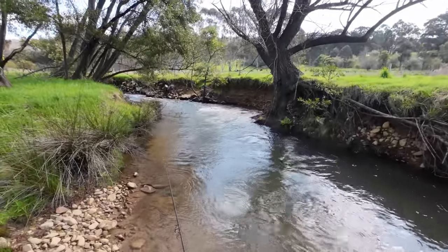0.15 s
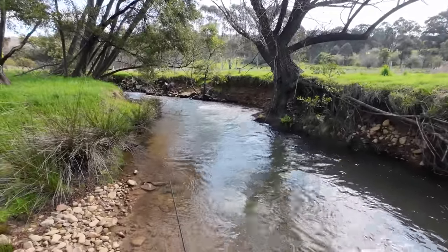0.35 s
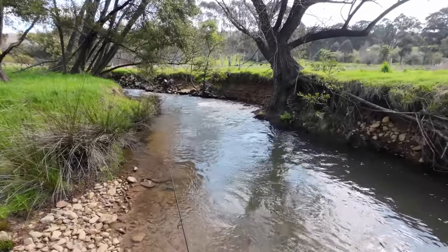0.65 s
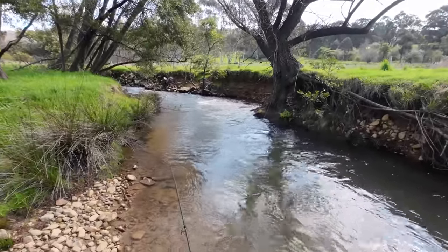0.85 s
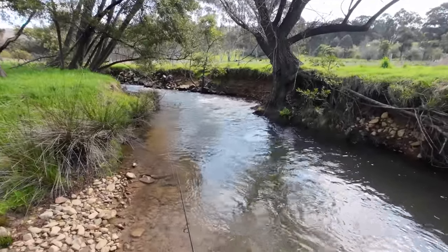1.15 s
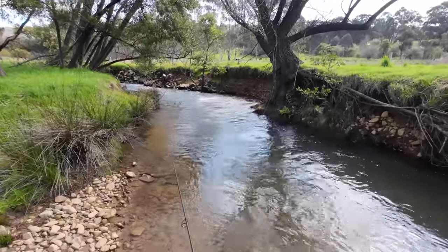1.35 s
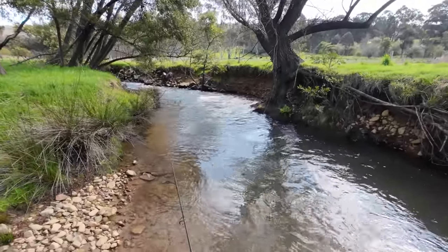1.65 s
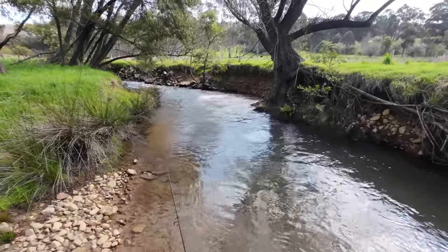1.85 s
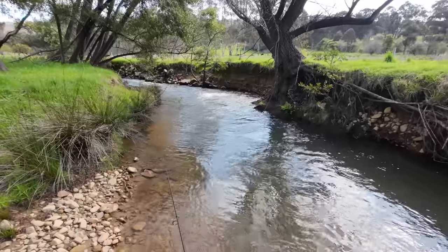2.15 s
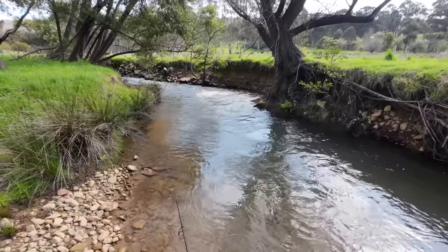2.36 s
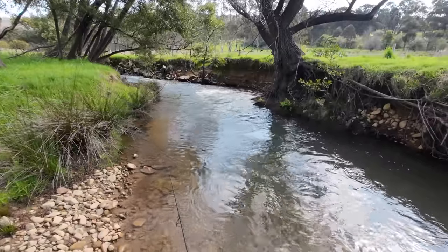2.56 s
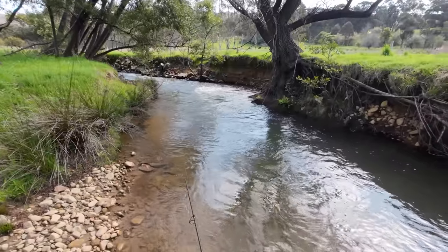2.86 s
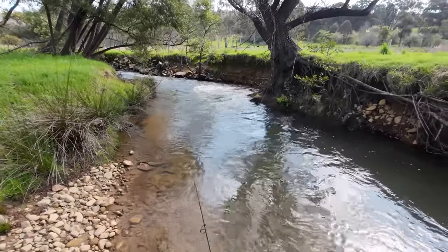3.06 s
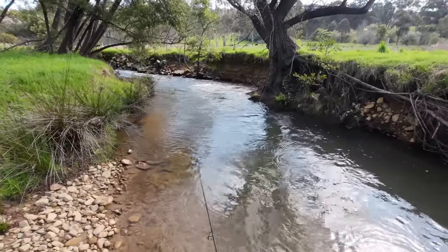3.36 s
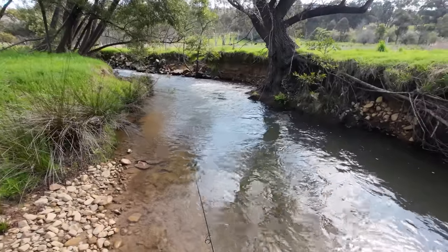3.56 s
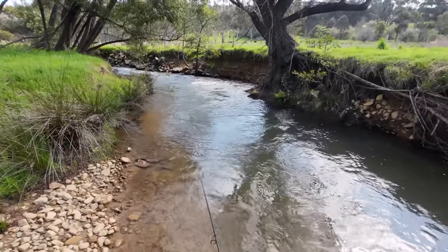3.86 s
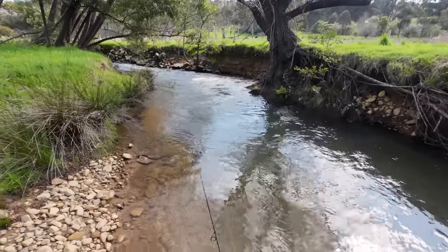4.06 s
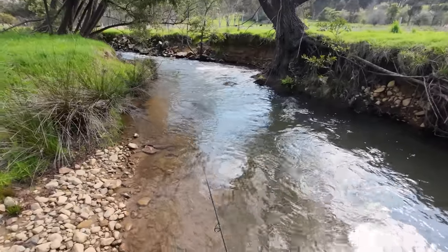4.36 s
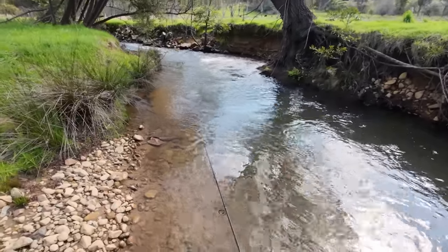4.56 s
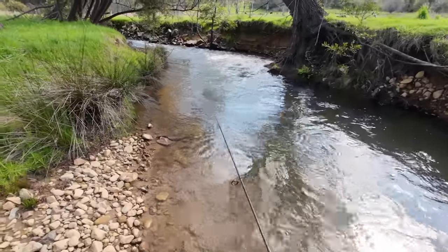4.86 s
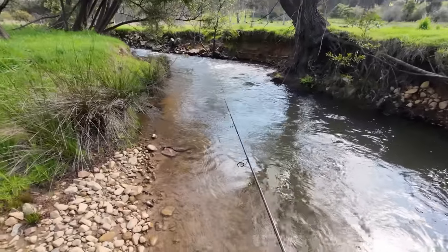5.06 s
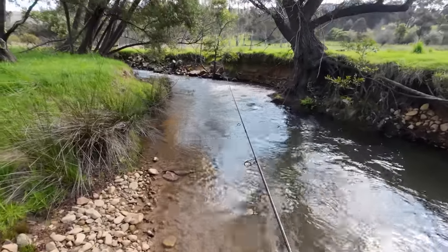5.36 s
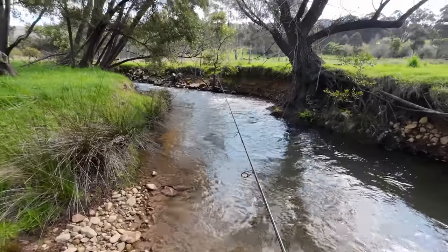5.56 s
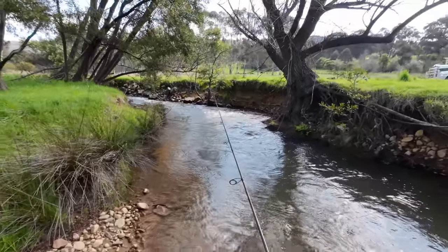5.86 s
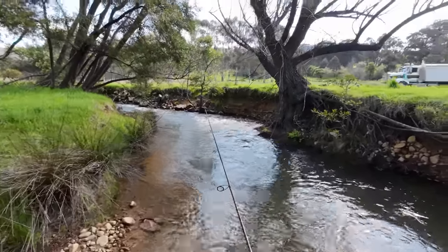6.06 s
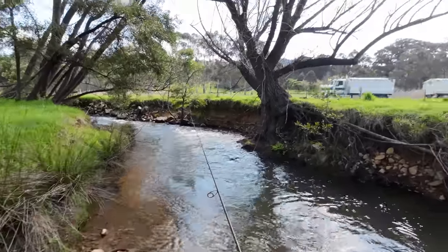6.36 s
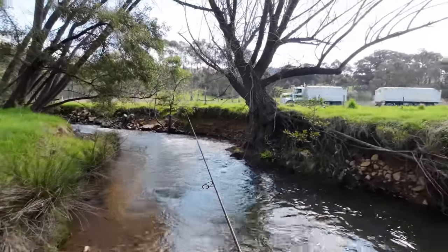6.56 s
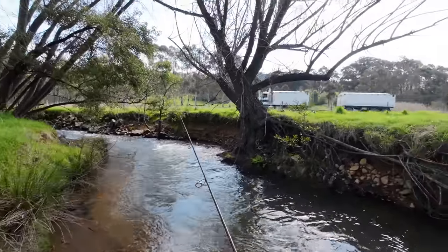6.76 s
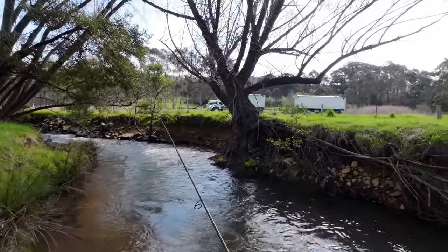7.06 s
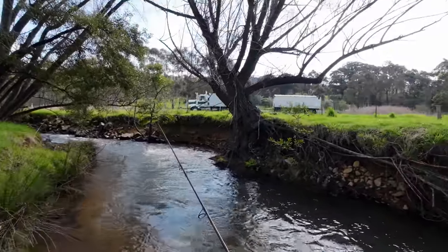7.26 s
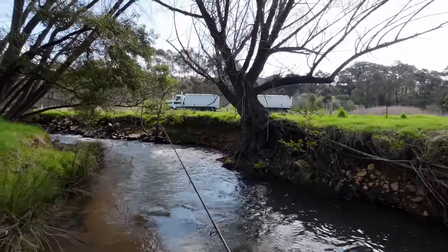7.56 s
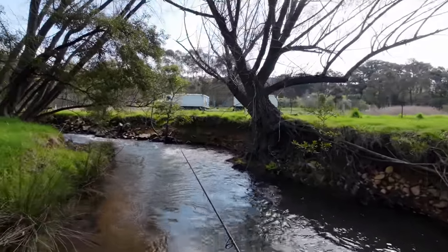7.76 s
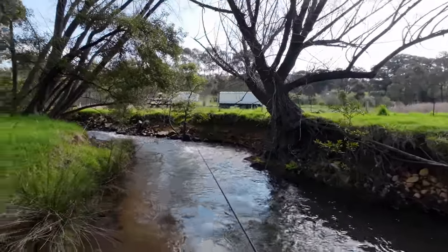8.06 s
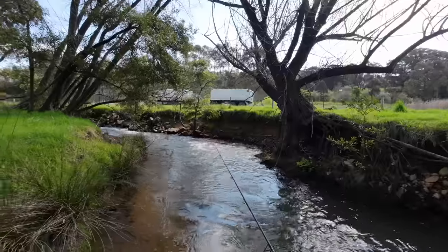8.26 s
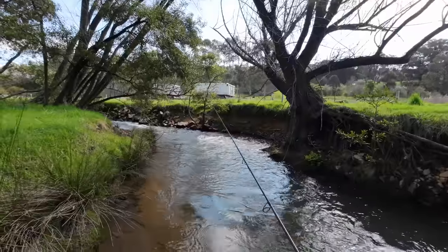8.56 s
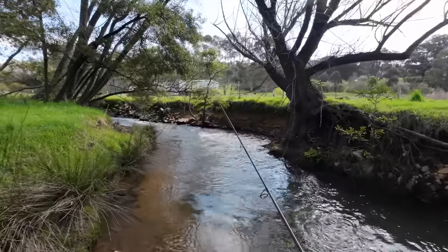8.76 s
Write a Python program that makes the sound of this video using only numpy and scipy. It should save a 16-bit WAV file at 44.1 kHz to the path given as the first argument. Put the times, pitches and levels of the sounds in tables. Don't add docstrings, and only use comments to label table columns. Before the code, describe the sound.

Deep hammering truck engine braking nears over a grassy creek, lets go twice between gears and surges back, with wind buffets and fishing reel ticks.

```python
import sys
import numpy as np
from scipy import signal
from scipy.fft import rfft, irfft, next_fast_len
from scipy.io import wavfile
from scipy.ndimage import uniform_filter1d, map_coordinates

SR = 44100
rng = np.random.default_rng(int(sys.argv[2]) if len(sys.argv) > 2 else 0)


def inscribe(sig):
    pcm = np.round(np.clip(np.atleast_2d(sig).T, -1, 1) * 32767)
    wavfile.write(sys.argv[1], SR, pcm.astype(np.int16))


def how_loud(loudness_db):
    steps = np.asarray(loudness_db, float) / 20
    return 10 ** steps


N = 393633

# time_s, firing_rate_hz
ENGINE_SPEED = [(0, 64.4), (.57, 63.3), (.72, 64.9), (.87, 75.5), (1.1, 73.8), (1.55, 74.88), (2.25, 70.1),
                (2.95, 66.91), (3.65, 62.94), (4.35, 59.44), (5.05, 56.19), (5.75, 52.55), (6.35, 50.56),
                (6.65, 48.96), (7.2, 68.44), (7.92, 64.25), (8.3, 64.18), (8.93, 62)]
# time_s, level_db
STACK_FACING = [(0, -13.5), (1.56, -22), (2.5, -15), (3.1, -12.5), (3.7, -10), (4.3, -6.5), (5.1, -1),
                (6.5, -0.5), (8.93, -5.5)]
# close_s, release_s, drone_db, tilt_db_per_order, build_up_s
BRAKE_BITES = [
    (-.3, .56, -8, 3, .1),
    (1.535, 6.555, -1.3, 0.85, 0.077),
    (8.315, 9.2, -7, 5, 0.112),
]
SNAP_S, LET_GO_S = 0.015, 0.044


def firings():
    return np.cumsum(curves(ENGINE_SPEED)[0]) / SR + .46


def blows(count, column, scatter_db, uneven):
    # dull_db, sharp_db, manifold_delay_ms
    cylinders = [(0, -2, .5), (-2, -4, 1.1), (1, -1, 0), (-2, -3, .9), (-2, -4, .3), (2.5, 6, 0)]
    at = np.flatnonzero(np.diff(np.floor(count))) + 1
    firing = np.floor(count[at]).astype(int)
    cylinder = np.array(cylinders)[(firing - 1) % 6]
    contrast = np.interp(at / SR, [4.6, 5.1], [1.35, .75])
    size = how_loud(contrast * cylinder[:, column] + scatter_db * rng.standard_normal(len(at)))
    late_ms = uneven * (cylinder[:, 2] + .2 * rng.standard_normal(len(at)))
    late = (late_ms * SR / 1000).astype(int)
    train = np.bincount(np.clip(at + late, 0, N - 1), size, N)
    steady = 0
    for k in range(1, 5):
        z = np.exp(2j * np.pi * k * count)
        in_phase = uniform_filter1d(train * z.real, SR // 5)
        quadrature = uniform_filter1d(train * z.imag, SR // 5)
        steady = steady + 2 * (z * in_phase - 1j * z * quadrature).real
    return train - steady - uniform_filter1d(train, SR // 5)


def bitten(column, follows):
    # growl_db, bark_db, lope_db, roar_db, closing_extra_db
    voices = [
        (-23, -47, -36, -27.5, -14),
        (-21.5, -35, -36.5, -23.5, 1),
        (-33.5, -30, -25, -30, 6.5),
    ]
    settle_s = 0.17
    t = np.arange(N) / SR
    on = 0
    for (start, end, *_), voice in zip(BRAKE_BITES, voices):
        extra_db = voice[4] * np.exp(-abs(t - start) / settle_s)
        on = on + gate(start, end, SNAP_S, LET_GO_S) * how_loud(voice[column] + extra_db)
    return on * how_loud(follows * curves(STACK_FACING)[0])


def brake(count):
    # pitch_hz, width_hz, level_db
    lope_modes = [(42, 14, -1), (100, 26, -2.5), (167.3, 33, 1.5)]
    growl_modes = [(272, 90, 1), (375, 120, 1)]
    bark_modes = [(440, 520, -2), (749, 273, 4), (970, 267, -2)]
    rasp_modes = [(2340, 250, 1.5), (3152, 1400, -8.5)]
    # pitch_hz, width_hz, level_db
    throat_modes = [(446, 76, 0)]
    # time_s, peak_db
    cracks = [
        (1.541, -26),
        (8.324, -22),
        (8.371, -3),
    ]
    # time_s, delay_ms, level_db
    echo = [(0, 4.03, -4.5), (3, 4.47, -0.5), (5, 3.5, -7), (6.5, 5.75, -5), (8.3, 4.96, -3),
            (8.93, 6.03, -7)]

    gas = unit(rng.standard_normal(N) * np.exp(-2.5 * (count % 1)))
    dull = unit(blows(count, 0, scatter_db=.8, uneven=.4))
    sharp = unit(blows(count, 1, scatter_db=1, uneven=1))
    behind = gate(*BRAKE_BITES[-1][:2], SNAP_S, LET_GO_S)

    def growl_pipe(f):
        delay = np.exp(-2j * np.pi * f * .0006)
        return abs(pipe(growl_modes)(f) * between(190, 490)(f)) * delay

    def edge(f):
        rasp = how_loud(-20) * pipe(rasp_modes)(f) * between(1900, 3800)(f)
        return pipe(bark_modes)(f) * between(330, 1150)(f) + rasp

    lope = unit(filtered(dull, lambda f: pipe(lope_modes)(f) ** 2 * between(20, 260)(f)))
    growl = unit(filtered(dull + .15 * gas, growl_pipe))
    bark = unit(filtered(sharp + .65 * gas, edge))
    throat = unit(filtered(sharp + gas, lambda f: pipe(throat_modes)(f) ** 2))
    first = np.zeros(N)
    for s, db in cracks:
        first[round(s * SR)] = how_loud(db + 31)

    shade = how_loud(-6.5 * gate(2, 4, 0.64, 0.04))
    top = bitten(column=0, follows=1) * growl
    top = top + bitten(column=1, follows=0.33) * shade * bark
    top = top + filtered(first, lambda f: edge(f) + 0.22 * abs(between(90, 900)(f)))
    top = top + how_loud(-32.5) * behind * throat

    delay_ms, echo_db = curves(echo)
    late = np.interp(np.arange(N) - delay_ms * SR / 1000, np.arange(N), top)
    n = SR // 4
    trees = rng.standard_normal(n) + 0.41 * rng.standard_normal((2, n))
    trees = trees * how_loud(-60 * np.arange(n) / SR / 0.34)
    scattered = signal.fftconvolve(top[None], trees / np.linalg.norm(trees[0]), axes=1)[:, :N]
    low = bitten(column=2, follows=-0.37) * lope
    return low + top + how_loud(echo_db) * late + how_loud(-9.5 + 3 * behind) * scattered


def order_gain(k):
    # pitch_hz, width_hz, level_db
    resonances = [(53, 30.5, -18.5), (60.43, 10.8, -14.5), (71.4, 16, -28.5), (109.5, 7.4, -29.5),
                  (124.47, 14, -22), (141.4, 18.3, -17.5), (154.6, 6.7, -19.5), (167, 6.6, -23),
                  (174.1, 2.1, -17), (180.2, 6, -18.5), (190.1, 15.75, -23), (211.9, 20.33, -19.5),
                  (239.9, 9.8, -24.5), (288.3, 31.6, -20.5)]
    # start_s, peak_s, end_s, drone_db, tilt_db_per_order
    blips = [
        (.66, 1.005, 1.1, -.1, -12),
        (1.218, 1.264, 1.33, -0.5, -19),
        (6.653, 6.838, 7.08, -1.4, -21),
        (7.02, 7.3, 7.55, -4.5, -2.5),
        (7.441, 7.62, 7.98, -2, -3),
    ]
    hz = (k + 1) * curves(ENGINE_SPEED)[0]
    power = sum((how_loud(db) / (1 + (2 * (hz - c) / w) ** 2)) ** 2 for c, w, db in resonances)
    load = 0
    for start, end, db, tilt, build in BRAKE_BITES:
        load = load + gate(start, end, build, LET_GO_S) * how_loud(db + k * tilt)
    for start, peak, end, db, tilt in blips:
        swell = gate(start, peak, peak - start, end - peak) ** 0.558
        load = load + swell * how_loud(db + k * tilt)
    brighten = 0.25
    return load * np.sqrt(power) * how_loud(brighten * k * curves(STACK_FACING)[0])


def drone(count):
    out = 0
    for k, lead in enumerate([.04, -.12, -.02, -.06]):
        lean = how_loud([[-.8], [.8]]) ** (k == 0)
        tone = np.cos(2 * np.pi * (k + 1) * (count + lead))
        out = out + np.sqrt(2) * order_gain(k) * lean * tone
    return out


def hum():
    # time_s, pitch_hz, level_db
    gear_tone = [(6.55, 254, -62), (6.62, 248, -38), (7, 240.4, -34), (7.3, 237.3, -35.5),
                 (7.5, 232, -33.5), (7.9, 222, -29.5), (8.1, 211.5, -30.5), (8.27, 228, -28.5),
                 (8.33, 235, -63)]
    hz, db = curves(gear_tone)
    return np.sqrt(2) * how_loud(db + 0.82 * wobble(15)) * np.sin(2 * np.pi * np.cumsum(hz) / SR)


def turbo():
    # time_s, pitch_hz, rush_db
    spool = [(0, 6500, -76), (3.6, 6400, -74), (4.2, 6230, -65), (5, 5900, -61), (5.6, 5600, -56),
             (5.9, 5450, -55), (6.85, 5250, -60), (6.98, 5300, -70), (8.93, 5500, -72)]
    # start_s, end_s, swell_s, level_db
    gulps = [
        (0.616, 1.095, 0.525, -48.5),
        (5.9, 6.078, 0.08, -46.5),
        (6.05, 7.1, .05, -66),
        (7.096, 7.923, .1, -52),
    ]
    # pitch_hz, level_db_per_hz
    intake = [(1300, -29.5), (2100, -2), (2500, 1), (3100, -2.5), (3600, -2.5), (5200, -30), (7000, -80)]
    hz, rush_db = curves(spool)
    whistle_db = rush_db - 1.5 - 17 * np.maximum(5950 - hz, 0) / 1000
    gulp = how_loud(-64.5)
    for start, end, swell, db in gulps:
        gulp = gulp + how_loud(db) * gate(start, end, swell, 0.036)
    carrier = 2 * np.pi * np.cumsum(hz) / SR
    whistle = how_loud(whistle_db + 4 * wobble(25)) * np.sin(carrier + 2 * wobble(75))
    band = unit(filtered(rng.standard_normal((2, N)), lambda f: 1 / (1 + (f / 280) ** 2)))
    whoosh = band[0] * np.sin(.98 * carrier) + band[1] * np.cos(.98 * carrier)
    return whistle + how_loud(rush_db) * whoosh + gulp * rush(intake, 0.906, patchy_db=1.2)


def road():
    # pitch_hz, level_db_per_hz
    roar = [(35, 2), (60, 5.5), (108, 10.5), (283, 7), (398, -0.5), (800, -12.5), (1160, -17),
            (1340, -26.5), (1800, -38.5), (2340, -82), (3960, -120)]
    hiss = [(600, -1), (1000, 0.5), (1400, -3), (1900, -7), (2400, -9), (3500, -12.5), (4000, -17.5),
            (5000, -42), (6500, -64.5)]
    tail_rasp = [(230, -25), (330, 2.5), (450, -2), (800, -5.5), (1400, -14), (1900, -51)]
    # start_s, peak_s, end_s, level_db
    shudders = [
        (0.843, 1.08, 1.19, -32),
        (6.9, 7.05, 7.2, -37),
    ]
    rumble = rush(roar, 0.99, patchy_db=2.0)
    dip_hz, half_width_hz, depth = 133, 20, 0.63
    hollow = filtered(rumble, lambda f: 1 - depth * np.exp(-((f - dip_hz) / half_width_hz) ** 2))
    coast = passing(-39.5, -30.5, 7, 0.94)
    for start, peak, end, db in shudders:
        coast = coast + how_loud(db) * gate(start, peak, peak - start, end - peak)
    tyres = passing(-49.5, -45, 7.5, 2.1) * rush(hiss, 0.97, patchy_db=0.7)
    exhaust_behind = passing(-58, -42, 7.5, 1.04) * rush(tail_rasp, 1.0, patchy_db=1.5)
    return coast * rumble + bitten(column=3, follows=0.57) * hollow + tyres + exhaust_behind


def reel():
    # time_s, peak_db, body_db, t60_s
    ticks = [(5.8316, -4.5, -26, 0.0036), (6.1263, -44, 5, 0.008), (6.2016, -10.5, -18.5, 0.0045),
             (6.2262, -25.5, -5.5, 0.011), (6.2401, -21, 5.5, 0.006), (6.2427, -23.5, 7, 0.0047),
             (6.256, -26.5, -7, 0.008), (6.7474, -8.5, -29, 0.0093), (6.7533, -28.5, 2, 0.008),
             (6.7584, -34, -4.5, 0.008), (8.9239, -35.5, -9, 0.008)]
    # pitch_hz, level_db, t60_s
    pawl = [(9500, -10, .018), (11200, 0, .007), (12400, -5, .008)]
    frame = [(3030, -2.5, 0.005), (4920, -5, 0.012), (6000, -2.5, 0.006)]
    out = np.zeros((2, N + SR))
    t = np.arange(SR // 20) / SR

    def ring(modes):
        total = 0
        for hz, db, t60 in modes:
            decay = how_loud(db + rng.normal(0, 0.83) - 60 * t / t60)
            total = total + decay * np.sin(2 * np.pi * hz * t + rng.normal(0, 0.18, (2, 1)))
        return total

    for s, db, body_db, t60 in ticks:
        noise = rng.standard_normal(len(t) + 1) + 0.55 * rng.standard_normal((2, len(t) + 1))
        crack = 0.75 * np.diff(noise) + how_loud(body_db + 14.0) * noise[:, 1:]
        tick = crack * how_loud(-60 * t / t60) + ring(pawl) + how_loud(body_db + 3.5) * ring(frame)
        start = round(s * SR)
        out[:, start:start + len(t)] += how_loud(db - 6.5) * tick * (1 - np.exp(-t / 0.00028))

    def ports(f):
        lag_s = 1.1e-5
        return np.exp(1j * np.pi * f * lag_s * np.array([[1], [-1]])) / (1 + (f / 12600) ** 12)

    return filtered(out[:, :N], ports) * how_loud([[.5], [-.5]])


def bird():
    # time_s, start_hz, end_hz, length_s, level_db
    chips = [(0.045, 6800, 4900, 0.012, -53.5), (.09, 7100, 7150, .008, -56), (.231, 5900, 5300, .01, -50),
             (0.408, 6400, 5170, .017, -46), (0.474, 6360, 6800, 0.0044, -47.5),
             (.488, 5100, 5400, .012, -54.5), (0.586, 6600, 5600, 0.0075, -45.5),
             (0.635, 7000, 5680, .012, -50), (0.651, 5600, 4870, .022, -51), (.826, 6600, 5000, .014, -53),
             (1.033, 5600, 5000, .016, -53), (1.213, 5600, 4900, .022, -56), (6.201, 4950, 4850, .009, -36)]
    out = np.zeros(N)
    for s, start_hz, end_hz, length, db in chips:
        u = np.linspace(0, 1, int(length * SR))
        phase = 2 * np.pi * np.cumsum(start_hz + (end_hz - start_hz) * u) / SR
        out[round(s * SR):][:len(u)] += how_loud(db) * np.sin(np.pi * u) * np.sin(phase)
    return out * how_loud([[.6], [-.6]])


def creek():
    # pitch_hz, level_db_per_hz
    fizz = [(1800, -2), (3000, -5), (3800, -7), (5400, -4.5), (7000, -10.5), (8800, -16), (10200, -13.5),
            (11800, -18), (13000, -38), (14200, -36.5), (15000, -33.5), (15700, -36.5)]
    jet = how_loud(-30) * bitten(column=1, follows=0.68)
    air = np.hypot(passing(-60.5, -52.5, 6.5, 0.72), jet)
    return air * how_loud(6 + .5 * wobble(30)) * rush(fizz, .5, patchy_db=.8)


def wind():
    # pitch_hz, level_db_per_hz
    buffet = [(8.8, -34), (15, 8), (32, -2), (54, 0), (157, -3), (341, -21.5), (500, -30), (650, -41),
              (1100, -120)]
    # start_s, end_s, level_db
    gusts = [
        (-.2, 2.25, -34),
        (2.499, 2.52, -25.5),
        (5.62, 6.04, -41.5),
        (6.5, 6.75, -32),
        (7.05, 6.82, -36),
        (7.55, 8.41, -38),
        (8.85, 9.8, -27),
    ]
    lumps = how_loud(.75 * wobble(14) + [[-1.2], [1.2]])
    strength = how_loud(-42)
    for start, end, db in gusts:
        strength = strength + how_loud(db) * gate(start, end, 0.065, 0.065)
    return strength * how_loud(7) * unit(lumps * rush(buffet, 0.25, patchy_db=3.0))


def unit(x):
    return x / np.sqrt(np.mean(x ** 2) + 1e-20)


def along(points, hz):
    f, v = np.transpose(points)
    return np.interp(np.log(hz + 1), np.log(f + 1), v)


def curves(rows):
    s, *cols = np.transpose(rows)
    return [np.interp(np.arange(N) / SR, s, c) for c in cols]


def wobble(rate):
    return map_coordinates(rng.standard_normal(int(N * rate / SR) + 4), [np.arange(N) * rate / SR])


def filtered(x, response):
    m = next_fast_len(N + SR // 2)
    return irfft(rfft(x, m) * response(np.fft.rfftfreq(m, 1 / SR)), m)[..., :N]


def pipe(modes):
    def response(f):
        total = 0
        for k, (c, w, db) in enumerate(modes):
            total = total + (-1) ** k * how_loud(db) * 1j * f * w / (c * c - f * f + 1j * f * w)
        return total
    return response


def between(lo_hz, hi_hz):
    pole = lambda u: 1 / (1 + 1.4j * u - u * u) ** 2
    return lambda f: pole(f / hi_hz) * pole(f / lo_hz) * (f / lo_hz) ** 4


def rush(spectrum, alike, patchy_db):
    z = signal.stft(rng.standard_normal((2, N)), nperseg=512)[2]
    field = uniform_filter1d(rng.standard_normal(z.shape[1:]), 6, 0)
    field = uniform_filter1d(field, 10, 1)
    pair = signal.istft(z * how_loud(patchy_db * unit(field)), nperseg=512)[1][:, :N]
    turn = np.arccos(np.clip(alike, -1, 1)) / 2
    shaped = filtered(pair, lambda hz: how_loud(along(spectrum, hz)))
    mid, side = shaped * [[np.cos(turn)], [np.sin(turn)]]
    return unit(np.array([mid + side, mid - side]))


def gate(start, end, rise, fall):
    t = np.arange(N) / SR
    return np.clip(np.minimum((t - start) / rise, 1 - (t - end) / fall), 0, 1)


def passing(far_db, closest_db, closest_s, half_width_s):
    t = np.arange(N) / SR
    return np.hypot(how_loud(far_db), how_loud(closest_db) / np.hypot(1, (t - closest_s) / half_width_s))


def scene():
    count = firings()
    truck = brake(count) + drone(count) + hum() + turbo() + road()
    return truck + reel() + bird() + creek() + wind()


def band_limit(x):
    return signal.sosfilt(signal.butter(12, 15750, fs=SR, output="sos"), x)


def record(dry):
    return band_limit(dry)


dry = scene()
out = record(dry)
inscribe(out)
```